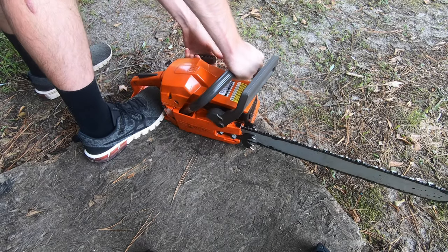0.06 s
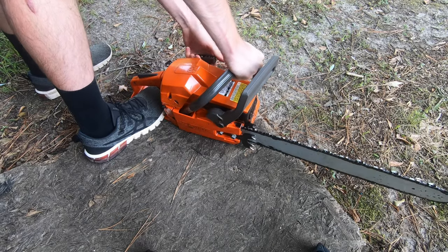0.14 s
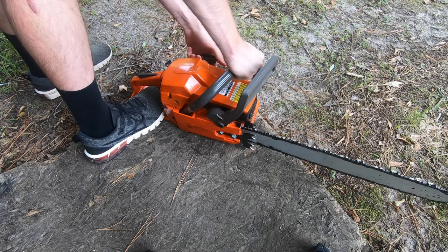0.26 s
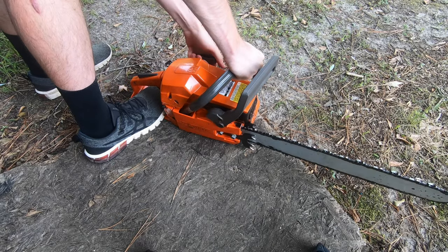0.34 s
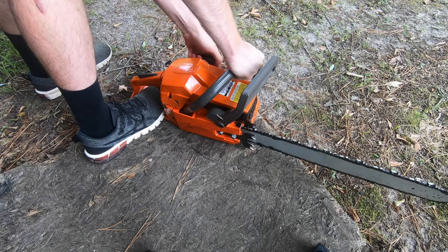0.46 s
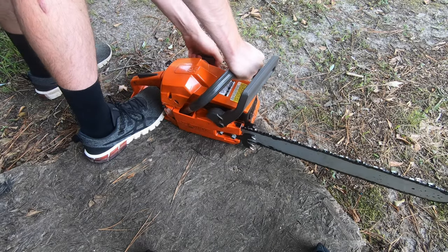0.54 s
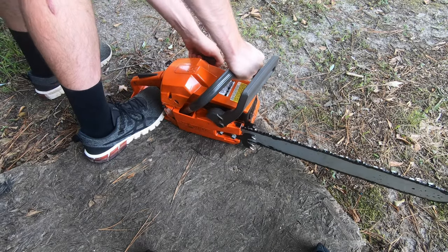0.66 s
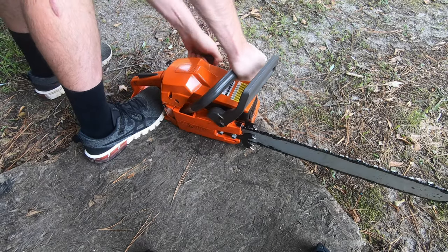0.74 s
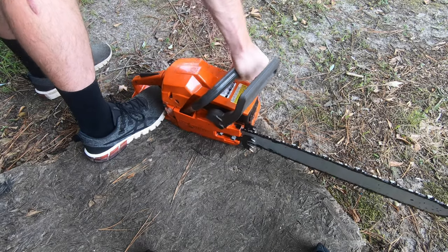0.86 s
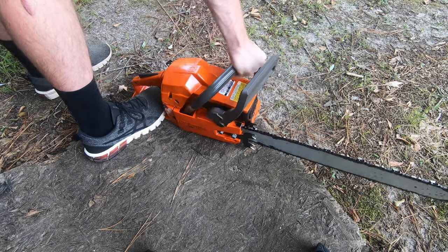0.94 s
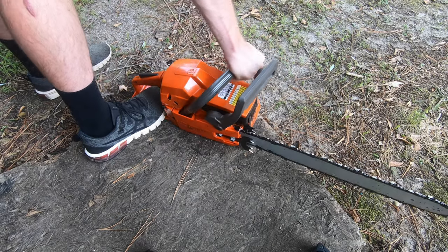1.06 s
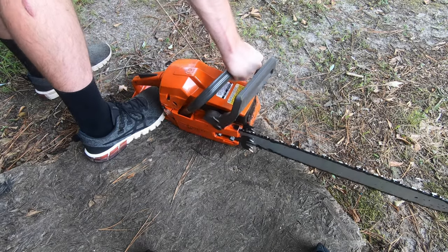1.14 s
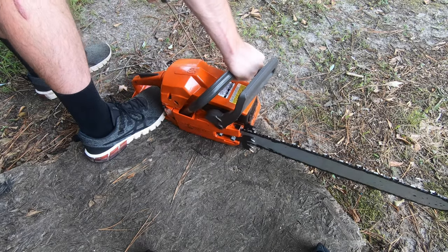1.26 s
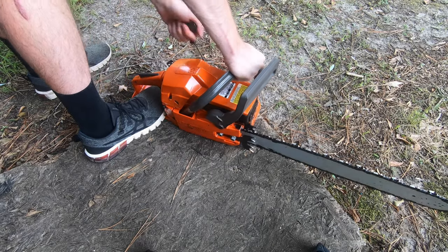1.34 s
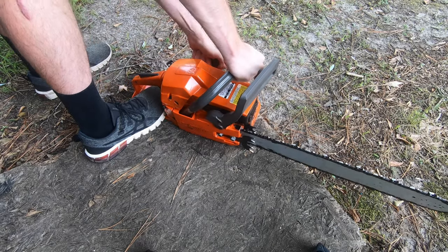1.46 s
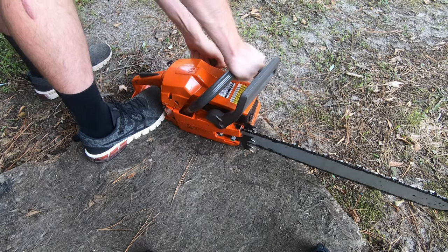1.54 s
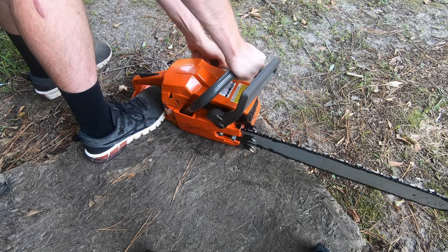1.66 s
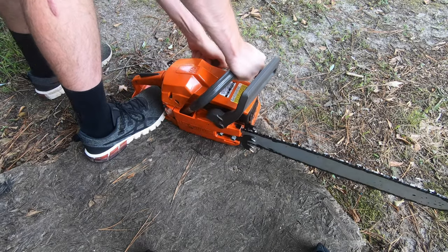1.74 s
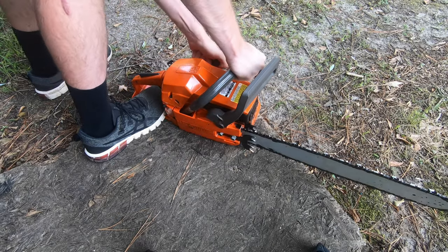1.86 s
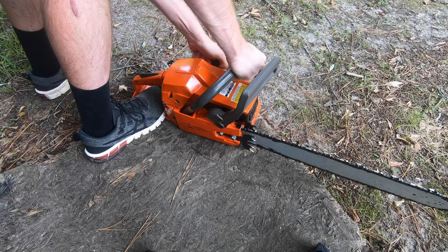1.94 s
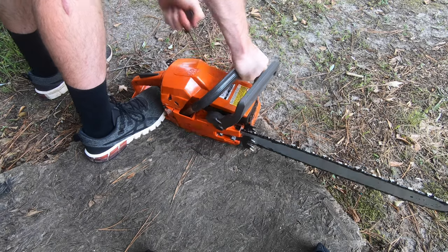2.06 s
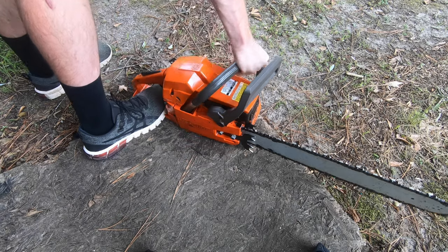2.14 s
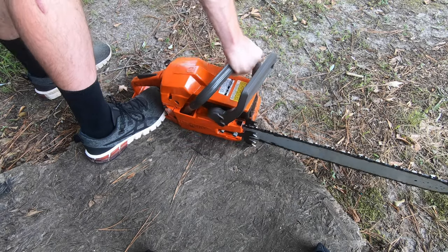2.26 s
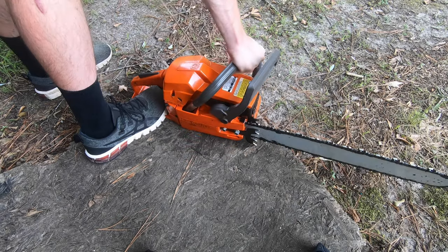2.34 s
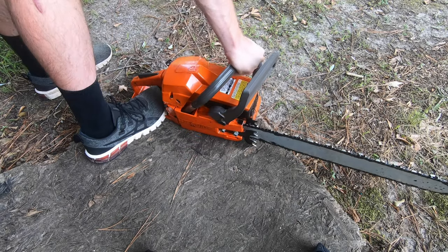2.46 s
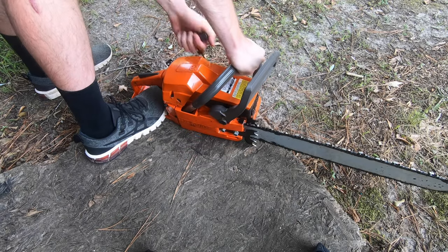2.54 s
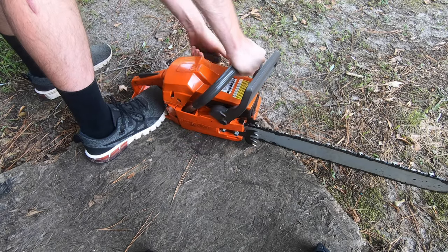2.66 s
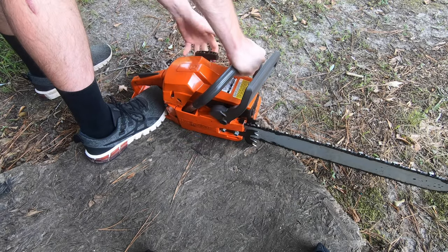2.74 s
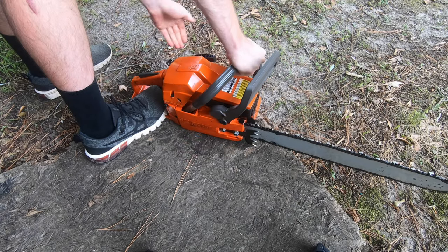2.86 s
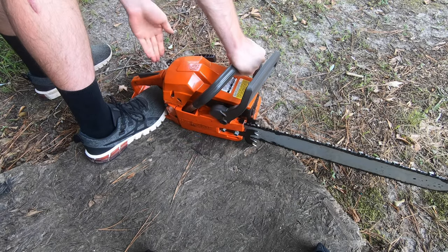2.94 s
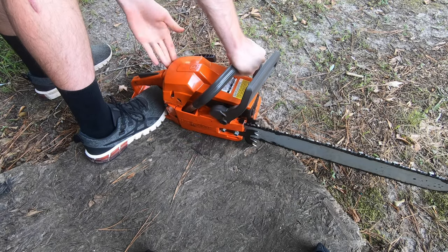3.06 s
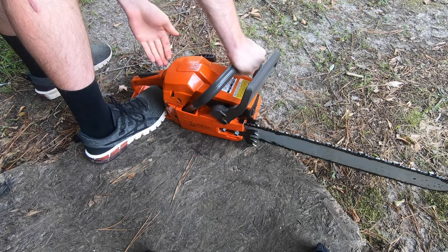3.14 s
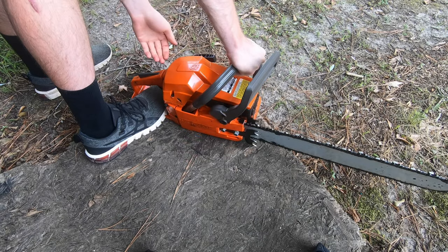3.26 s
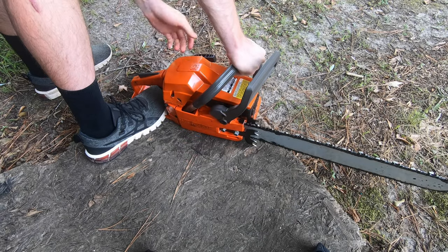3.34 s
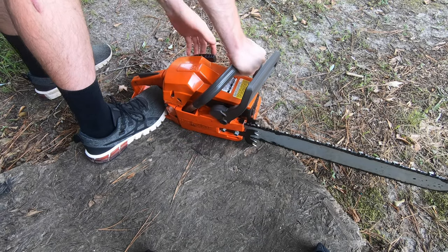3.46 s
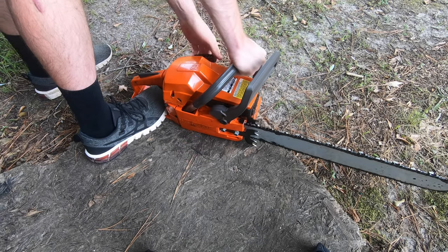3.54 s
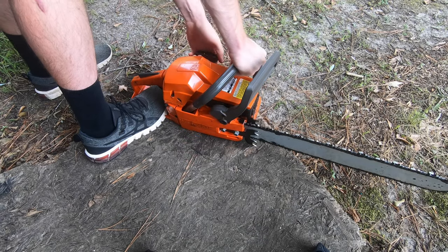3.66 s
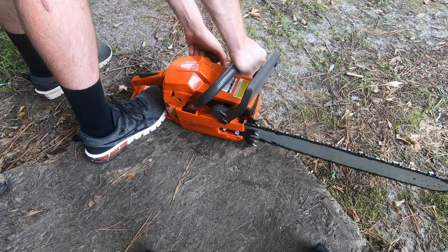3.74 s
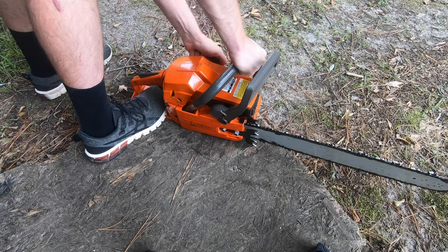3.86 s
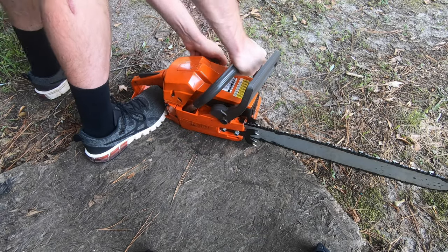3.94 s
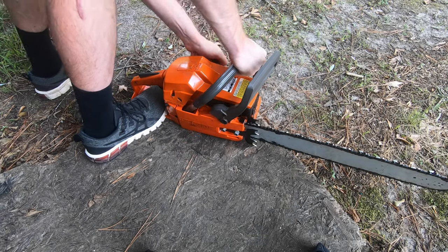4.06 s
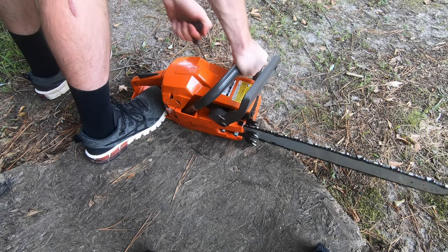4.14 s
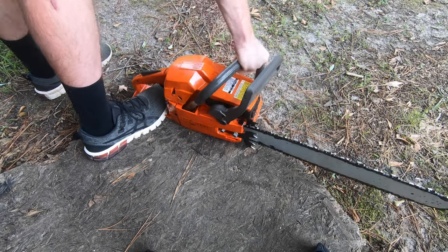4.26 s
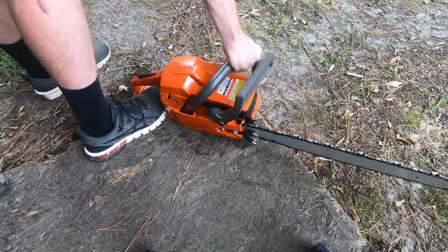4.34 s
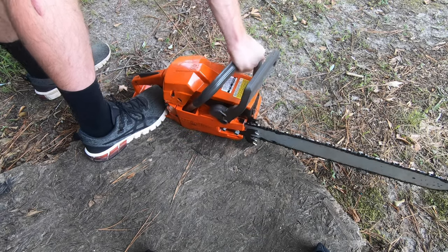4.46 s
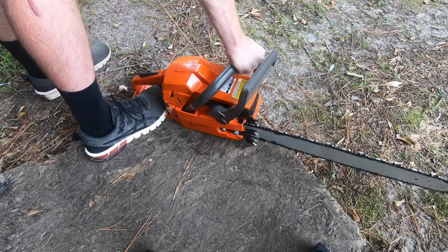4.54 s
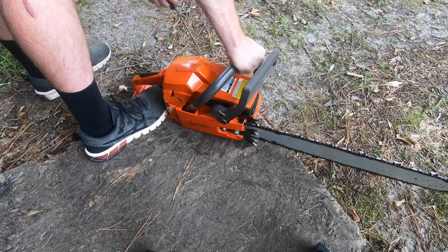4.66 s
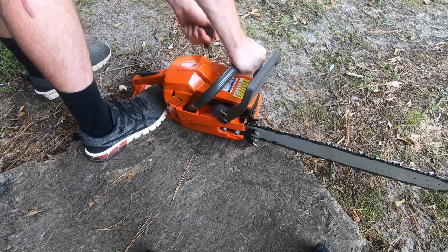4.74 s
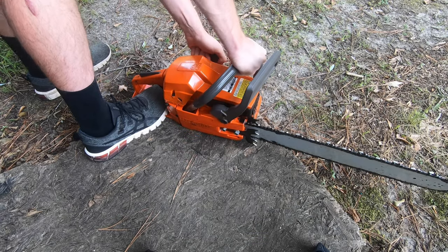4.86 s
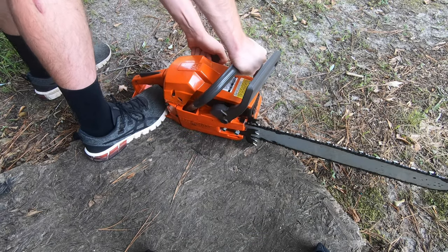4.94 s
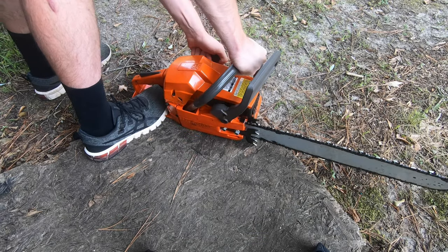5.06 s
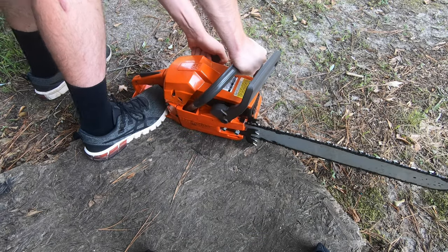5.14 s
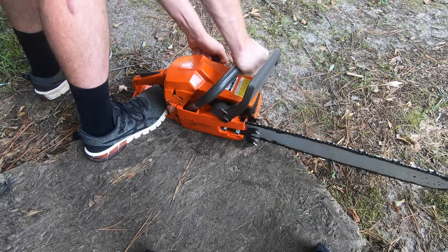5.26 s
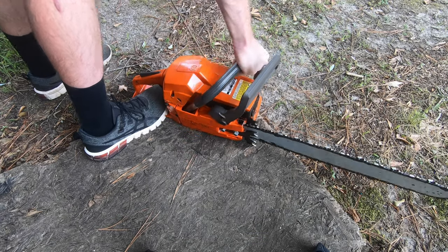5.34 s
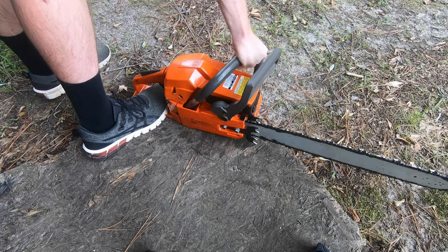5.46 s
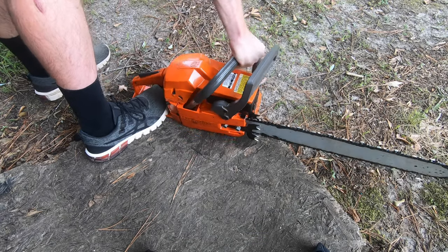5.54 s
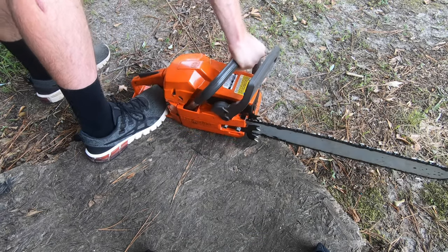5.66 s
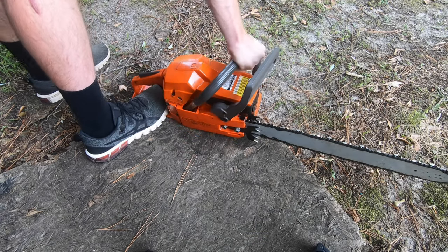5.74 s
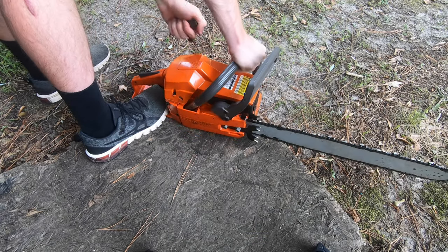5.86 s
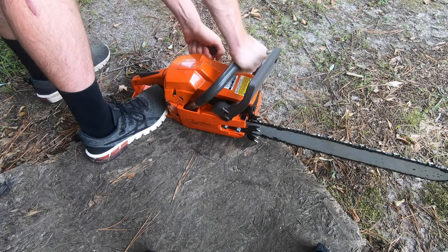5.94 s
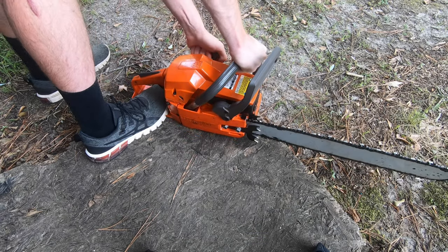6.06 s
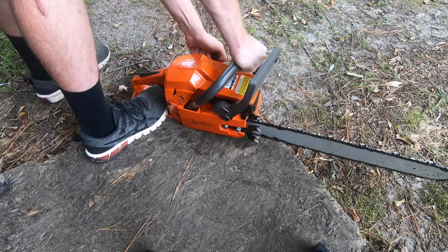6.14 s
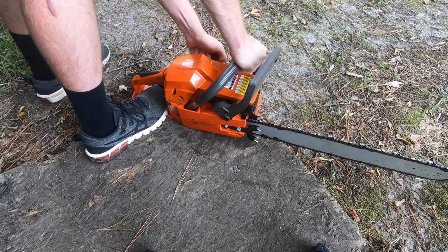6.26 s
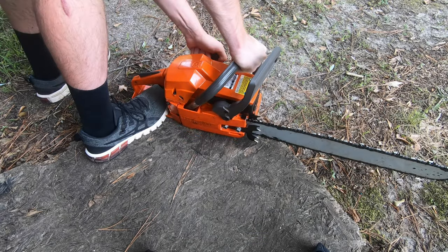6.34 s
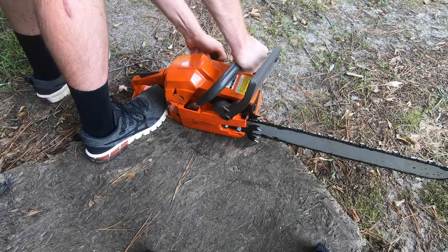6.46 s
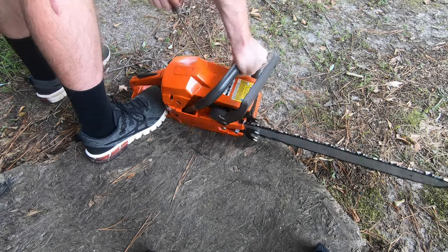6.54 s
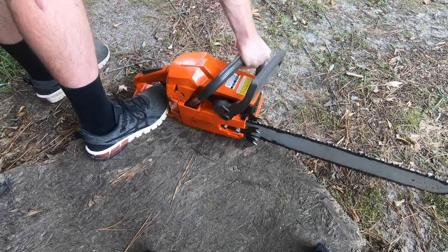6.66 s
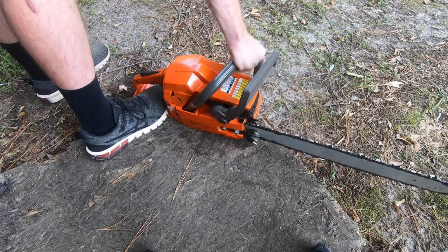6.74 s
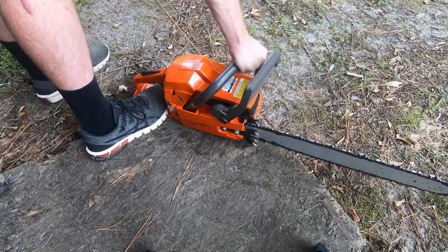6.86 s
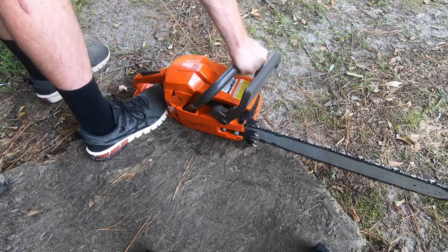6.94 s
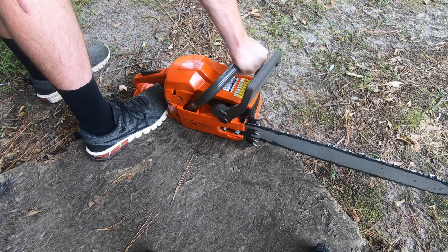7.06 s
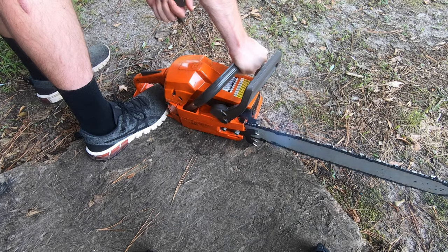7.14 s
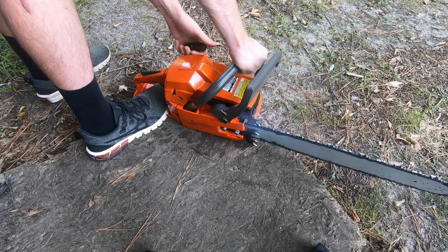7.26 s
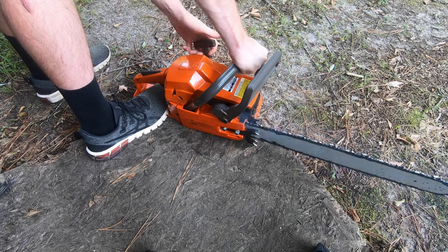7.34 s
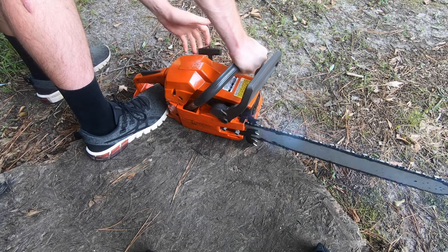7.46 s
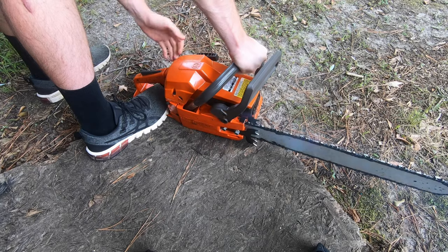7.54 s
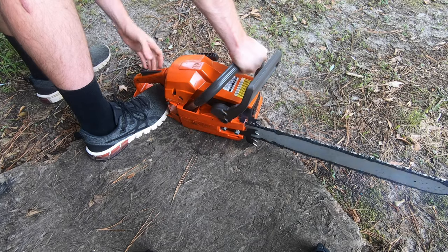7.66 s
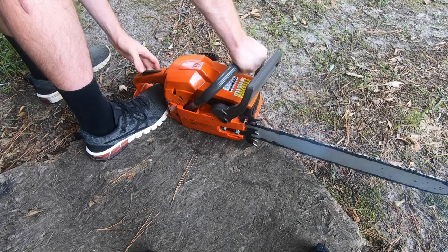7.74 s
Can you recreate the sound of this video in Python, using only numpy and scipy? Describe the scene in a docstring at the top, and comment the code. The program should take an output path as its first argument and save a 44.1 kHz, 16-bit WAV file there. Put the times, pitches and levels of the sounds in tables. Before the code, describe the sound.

Right beside the microphone, a two-stroke saw refuses to start four times: hard clack, short throbbing burst of air pulses, metallic rattling, sharp rasp, ticking rewind and dull handle knock, with quiet pauses between. On the fifth tug it fires, popping irregularly, surging and coasting, with a thin metallic ringing growing. Open yard, slight echo, low thumps, soft hiss.

```python
"""A two-stroke chainsaw on the ground outdoors is pulled five times on its cord and catches on the last pull.
Each crank turn gulps air (short filtered pulses) and rattles the piston (bursts of noise that ring).
The starter pawls clack and rasp, and the cord scrapes out and winds back, all made of coloured noise.
The idle lopes: the engine fires only every few turns, speeding up and coasting down in between.
Low booms and shaking, a faint echo and a distant rumble with soft hiss lie around it."""
import sys
import numpy as np
from scipy import signal
from scipy.fft import rfft, irfft
from scipy.io import wavfile
from scipy.ndimage import uniform_filter1d

SR = 44100
rng = np.random.default_rng(int(sys.argv[2]) if len(sys.argv) > 2 else 0)


def digitize_waveform(pressure):
    """Quantize a signal to 16-bit integers and store it at the path in sys.argv[1].

    Rows of a 2-D input are taken as channels; values are limited to [-1, 1].
    """
    field = np.atleast_2d(pressure).T
    bounded = np.clip(field, -1, 1)
    quanta = np.round(bounded * 32767).astype(np.int16)
    wavfile.write(sys.argv[1], SR, quanta)


N = 343539
TIME = np.arange(N) / SR


def amp(db):
    """Turns decibels into a gain."""
    return 10 ** (np.asarray(db) / 20)


def unit(x):
    """Scales to an rms of 1."""
    return x / np.sqrt(np.mean(x ** 2) + 1e-20)


def read(points, hz):
    """Reads a table between its points, on a log-frequency axis."""
    f, value = np.transpose(points)
    return np.interp(np.log(hz + 1), np.log(f + 1), value)


def add(mix, s, sound):
    """Mixes a sound in at time s."""
    part = mix[max(round(s * SR), 0):][:len(sound)]
    part += sound[:len(part)]


def response(spectrum, size=4096):
    """A filter of energy 1 with the given spectrum that answers only after it is struck."""
    log_gain = np.log(amp(read(spectrum, abs(np.fft.fftfreq(size, 1 / SR)))))
    minimum_phase = np.exp(np.conj(signal.hilbert(log_gain)))
    taps = np.fft.ifft(minimum_phase).real[:size // 2]
    return taps / np.linalg.norm(taps)


def through(x, taps):
    """Filters x and keeps its length."""
    return signal.oaconvolve(x, taps)[:len(x)]


def grit(count, spread_db):
    """Noise whose strength jumps every 16 samples, like tiny impacts of unequal size."""
    draws = rng.standard_normal(count // 16 + 1).clip(-2, 2)
    sizes = np.repeat(amp(max(spread_db, 0) * draws), 16)[:count]
    return unit(sizes * rng.standard_normal(count))


def spell(t, start, hold, rise_db_per_s, fall_db_per_s):
    """A gain that rises to 1 at start, holds, and dies away."""
    before, after = np.maximum(start - t, 0), np.maximum(t - start - hold, 0)
    return amp(-rise_db_per_s * before - fall_db_per_s * after)


# Colour of the outdoor background. Each row: frequency in Hz, level in dB.
AIR_COLOUR = [(15, -57.5), (25, -31.5), (35, -22.5), (54, -4), (137, -11.5), (170, -5), (285, -24),
              (405, -18), (575, -29.5), (774, -25.5), (987, -29.5), (1740, -29.5), (2340, -37), (8350, -52),
              (16000, -83.5)]
AIR_DB = -48.5


def outdoors():
    """Steady distant rumble and a soft hiss: filtered noise, partly shared by left and right."""
    noises = rng.standard_normal((3, N))
    common, left, right = (through(z, response(AIR_COLOUR, size=16384)) for z in noises)
    return unit(common + 1.12 * np.array([left, right])) * amp(AIR_DB) * amp([[-1.5], [1.5]])


def yard(x, t60=0.38, alike_from_hz=190, alike_to_hz=600):
    """Faint scatter from the ground and trees, different left and right except in the low middle."""
    t = np.arange(SR // 2) / SR
    common, *own = rng.standard_normal((3, len(t)))
    band = [alike_from_hz, alike_to_hz]
    alike = signal.butter(3, band, "bandpass", fs=SR, output="sos")
    apart = signal.butter(3, band, "bandstop", fs=SR, output="sos")
    tails = signal.sosfilt(alike, common) + signal.sosfilt(apart, own)
    tails = tails * amp(-60 * t / t60) * np.minimum(t / 0.014, 1)
    colour = response([(50, 14.0), (140, 11), (260, 1.5), (500, 5),
                       (1500, 2), (4000, -3.5), (7000, 2.5), (14000, 3.5)])
    coloured = through(x, colour)
    return np.array([through(coloured, tail / np.linalg.norm(tail)) for tail in tails])


# Spells of low shaking. Each row: time of full strength in seconds, hold in seconds, level in dB.
SHAKES = [(0.0, 0.015, -24), (1.119, 0.35, -24.5), (2.358, 0.26, -26.5), (4.39, .44, -26.5),
          (5.573, 0.44, -28.5), (6.855, 0.47, -26.5), (7.4, 0.47, -32)]
SHAKE_RISE_DB_PER_S, SHAKE_FALL_DB_PER_S = 77.5, 85


def shake_level():
    """How strong the low shaking is: each spell swells, holds and fades."""
    slopes = SHAKE_RISE_DB_PER_S, SHAKE_FALL_DB_PER_S
    return sum(amp(db) * spell(TIME, s, hold, *slopes) for s, hold, db in SHAKES)


def unsteady_rumble():
    """A low rumble of filtered noise comes and goes with the shaking, unrelated left and right."""
    colour = response([(20, -24.0), (38, -9.5), (60, -2.5), (110, 2.5),
                       (170, -9.5), (260, -18.5), (600, -73)], size=8192)
    rumble = np.array([through(z, colour) for z in rng.standard_normal((2, N))])
    return rumble * shake_level() * amp([[-7], [0]])


def shaking():
    """A low tone wavers around 38 Hz, swelling, holding and fading in spells."""
    sway = through(rng.standard_normal(N), signal.windows.hann(SR // 12))
    shake_hz = 38 + 3.5 * unit(sway)
    shake = np.sin(2 * np.pi * np.cumsum(shake_hz) / SR)
    return amp(-3.0) * unit(shake) * shake_level()


def boom(db, hz):
    """A low boom of two tones that swells and fades."""
    t = np.arange(SR // 4) / SR
    swell = t / .016
    tones = np.sin(2 * np.pi * hz * t) + 0.74 * np.sin(2 * np.pi * 0.57 * hz * t)
    return amp(db) * swell * np.exp(1 - swell) * tones


# Each pull begins as the pawls catch. Each row: start in seconds, clack level in dB,
# boom level in dB, piston rattle level of this pull in dB.
PULLS = [(0.846, -11.5, -19.5, -25.5), (2.108, -7.5, -24, -25.5), (4.202, -22, -31.5, -24),
         (5.365, -18, -22, -24.5), (6.564, -21.5, -22.5, -22)]
# The plastic cord handle lands on the case. Each row: start in seconds, knock level in dB,
# treble setting in dB, boom level in dB, boom pitch in Hz.
HANDLE_KNOCKS = [(0.008, -12.5, -20.5, -23.5, 144), (1.521, -13.5, -42, -34, 146),
                 (3.081, -23.5, -33.5, -36.5, 90), (3.729, -32.5, -22.5, -37.5, 158),
                 (4.917, -20, -46, -29, 146.4)]
PULL_BOOM_HZ, PULL_BOOM_LAG_S, KNOCK_BOOM_LAG_S = 138, .009, .023


def booms():
    """A low boom follows shortly after each pull begins and after each handle knock."""
    out = np.zeros(N)
    for s, _, db, _ in PULLS:
        add(out, s + PULL_BOOM_LAG_S, boom(db, PULL_BOOM_HZ))
    for s, _, _, db, hz in HANDLE_KNOCKS:
        add(out, s + KNOCK_BOOM_LAG_S, boom(db, hz))
    return out


def varied_ring(t60=.03, count=9):
    """A few short ringing tones at randomly varied pitches."""
    t = np.arange(SR // 25) / SR
    hz = np.geomspace(700, 8000, count)[:, None] * np.exp(.13 * rng.standard_normal((count, 1)))
    return np.sin(2 * np.pi * hz * t).sum(0) * amp(-60 * t / t60)


# Basic colour of a clack. Each row: frequency in Hz, level in dB.
CLACK_COLOUR = [(150, -21), (450, -10.5), (700, 0.5), (1000, -8), (1400, -2), (2000, -4), (2900, 0.5),
                (4000, -1), (5100, -1), (6500, -1.5), (8200, -3), (10500, -16.5), (14000, -27),
                (16000, -36)]


def clack(db, low_db, treble_db, t60, ring_db=-10):
    """One knock is a short burst of noise; soft parts sound low, steel parts bright."""
    t = np.arange(SR // 5) / SR
    hardness = [(1000, 0.79 * (low_db + 13.5)), (2600, 0), (6500, 0.76 * (treble_db + 9.5))]
    colour = [(hz, level + read(hardness, hz)) for hz, level in CLACK_COLOUR]
    blow = grit(len(t), spread_db=2) * np.minimum(t / 0.0023, 1) * amp(-60 * t / max(t60, .005))
    ring = varied_ring()
    blow = blow + amp(ring_db) * through(blow, ring / np.linalg.norm(ring))
    return amp(db) * through(blow, response(colour))


# Bright clacks of loose steel, and two dull piston slaps on slow turns (at 1.288 and 2.61 s).
# Each row: start in seconds, level in dB, treble setting in dB, time to decay by 60 dB in seconds.
CLACKS_AND_SLAPS = [(0.06, -34, -16.5, .05), (0.155, -24, -16, 0.025), (0.223, -46, -29, .04),
                    (1.132, -18, -10, 0.05), (1.181, -20, -6, .065), (1.22, -15.5, -13, 0.088),
                    (1.288, -23.5, -23.5, 0.051), (1.551, -26, -11.5, 0.055), (1.615, -25.5, -12.5, .046),
                    (2.452, -13.5, 1, 0.052), (2.536, -15.5, -4.5, .06), (2.61, -23.5, -27, .06),
                    (4.564, -19.5, -13.5, .037), (4.598, -12, -3, 0.031), (4.849, -20.5, -29.5, .03),
                    (5.014, -27.5, -40, 0.02), (5.044, -45, -31, .036), (5.687, -8.5, -1.5, .025),
                    (5.755, -14, -2, 0.024), (5.837, -12, -10, .038), (6.093, -16.5, -35, .02),
                    (6.137, -22.5, -22, .065), (7.109, -14, -11.5, .034)]
BOUNCE_S, BOUNCE_DB = .016, -4


def clacks():
    """The pawls catch, loose steel clacks, two slow turns slap dully, and the handle lands and bounces."""
    out = np.zeros(N)
    for s, db, _, _ in PULLS:
        add(out, s, clack(db, low_db=-11, treble_db=-17.5, t60=0.04))
    for s, db, treble_db, t60 in CLACKS_AND_SLAPS:
        add(out, s, clack(db, low_db=-15.5, treble_db=treble_db, t60=t60))
    for s, db, treble_db, _, _ in HANDLE_KNOCKS:
        add(out, s, clack(db, low_db=-3, treble_db=treble_db, t60=0.039, ring_db=-25.5))
        bounce = clack(db + BOUNCE_DB, low_db=-4, treble_db=treble_db, t60=0.038, ring_db=-25.5)
        add(out, s + BOUNCE_S, bounce)
    return out


# The cord winds back while the pawls tick over the flywheel.
# Each row: start in seconds, length in seconds, tick level in dB.
REWINDS = [(1.336, .12, -20.5), (2.694, .11, -24), (4.75, .09, -21), (6.002, 0.084, -21.5)]
TICK_GAP_S, TICK_SPREAD_DB = .021, 1.5


def rewinds():
    """The pawls tick unevenly as the spring winds the cord back in."""
    out = np.zeros(N)
    for start, length, db in REWINDS:
        for s in np.arange(start, start + length, TICK_GAP_S):
            late, size, bright = rng.standard_normal(3)
            tick_db = db + TICK_SPREAD_DB * size
            add(out, s + .003 * late, clack(tick_db, low_db=-12.5, treble_db=-16 + 3 * bright, t60=.038))
    return out


# The cord zips out before the first turn. Each row: start in seconds, level in dB, base pitch in Hz.
ZIPS = [(.88, -29.5, 664), (2.138, -31.5, 725), (4.243, -26.5, 663), (5.42, -30, 736), (6.62, -23.5, 633.5)]


def zips():
    """The cord scrapes out through its eyelet, swelling into a short falling buzz."""
    out, t = np.zeros(N), np.arange(round(0.039 * SR)) / SR
    swell_t = np.arange(round(.09 * SR)) / SR
    swell = np.interp(swell_t, [0, .01, .045, .07, .09], [0, .3, .4, 1, 0])
    eyelet = response([(150, -14.0), (450, 2.0), (700, -10.5), (1200, -6.5),
                       (2500, -16.5), (5000, -24.5), (12000, -45.0)])
    for s, db, hz in ZIPS:
        jitter = unit(uniform_filter1d(rng.standard_normal(len(t)), size=30))
        pitch = hz * np.linspace(1.2, .85, len(t)) * (1 + 0.35 * jitter)
        phase = 2 * np.pi * np.cumsum(pitch) / SR
        buzz = np.hanning(len(t)) * (np.sin(phase) + 0.23 * np.sin(2 * phase))
        add(out, s - .002, amp(db + 1) * unit(buzz))
        scrape = through(swell * grit(len(swell), spread_db=3), eyelet)
        add(out, s - .05, amp(db - 1.5) * scrape)
    return out


# The pawls skid off the flywheel at the end of each stroke.
# Each row: start in seconds, level in dB, length in seconds.
SKIDS = [(1.0512, -13.5, 0.029), (2.278, -13, 0.017), (4.3987, -13.5, 0.019), (5.549, -14.5, 0.026),
         (6.782, -14.5, 0.023)]
# Colour of the skids. Each row: frequency in Hz, level in dB.
SKID_COLOUR = [(2060, -37), (3500, -26.5), (4600, -5), (5030, -15), (5640, -3.5), (6610, 1), (7180, -10),
               (7940, -8), (9250, -15), (11300, -24.5), (13600, -21.5), (16000, -43)]


def skids():
    """The pawls catch twice on the flywheel as it overruns the starter: a bright rasp."""
    out = np.zeros(N)
    for s, db, length in SKIDS:
        u = np.arange(SR // 12) / SR / length  # time, in skid lengths
        contact = np.interp(u, [0, .06, .3, .5, .75, 1.1], [0.17, 1, 1.0, .45, 1.0, 0.043])
        add(out, s - .001, amp(db - 2.5) * contact * grit(len(u), spread_db=-4.5))
    return through(out, response(SKID_COLOUR))


# Ringing tones of the case, bar and chain. Each row: pitch in Hz, level in dB,
# time to decay by 60 dB in seconds.
CASE_TONES = [(743, -21.5, 0.024), (1419, -2, 0.15), (2046, -7, .07), (2170, -21.5, 0.21),
              (2760, -13, 0.21), (2855, -2.5, 0.03), (3690, -12.5, 0.24), (3960, -0.5, .1),
              (4615, 3.5, 0.087), (5740, 6, 0.11), (6700, 1, 0.11), (6900, -13.5, 0.092),
              (8160, -11.5, 0.28), (8100, -2.5, .2), (9953, -15.5, .2)]


def case_ring(x):
    """The case, bar and chain ring with their own tones when struck by x."""
    t = np.arange(SR // 2) / SR
    tones = sum(amp(db - 60 * t / t60) / np.sqrt(t60) * np.sin(2 * np.pi * hz * t)
                for hz, db, t60 in CASE_TONES)
    return through(x, tones / np.linalg.norm(tones))


# The engine fires. Each row: time in seconds, level in dB, crank turns until the next firing.
FIRINGS = [(6.9113, -2.5, 6), (7.0404, -9.5, 5), (7.1581, -4, 4), (7.241, -4.5, 6), (7.3481, -4, 6),
           (7.45, -5, 5), (7.5404, -5, 8), (7.6803, -5, 5), (7.7655, -4, 5)]


def clutch_ring(hz=5790, t60=0.89, knock_db=-55, firing_db=-36.0, running_t60=0.19, singing_db=-42):
    """The clutch drum rings after the first knock and each firing, and sings on through the idle."""
    out, t = np.zeros(N), np.arange(SR) / SR
    add(out, HANDLE_KNOCKS[0][0], amp(knock_db - 60 * t / t60) * np.sin(2 * np.pi * hz * t))
    for s, _, _ in FIRINGS:
        level_db = firing_db + 8 * (s - FIRINGS[-1][0])  # later firings ring louder
        tone = np.sin(2 * np.pi * (hz + rng.normal(0, 30)) * t)
        add(out, s, amp(level_db - 60 * t / running_t60) * tone)
    # the shoes brush the drum more and more
    brushing = np.interp(TIME, [7.2, 7.3, 7.79], [0, .7, 1.3])
    drum = amp(-60 * t / .15) * np.sin(2 * np.pi * 5850 * t)
    return out + amp(singing_db) * brushing * unit(through(rng.standard_normal(N), drum))


# Colour of the firing crack. Each row: frequency in Hz, level in dB.
BANG_COLOUR = [(100, 15), (300, 4.5), (900, -7), (2200, -1.5), (4200, 0.5), (5100, -4.5), (6200, 1),
               (8000, -2.5), (11000, -15), (14000, -20.5), (16000, -42)]


def firings():
    """A firing vents a short, sharp crack of noise from the muffler."""
    out, t = np.zeros(N), np.arange(SR // 20) / SR
    for s, db, _ in FIRINGS:
        vent = np.minimum(t / .0003, 1) * np.exp(-np.maximum(t - .0035, 0) / 0.0033)
        add(out, s, amp(db - 6) * vent * rng.standard_normal(len(t)))
    return through(out, response(BANG_COLOUR))


CORD_DB, REWIND_JINGLE_DB = -38.5, -43.5
CORD_RISE_DB_PER_S, CORD_FALL_DB_PER_S = 278.5, 326


def cord_jingle(t):
    """Loudness of the cord's jingle, at the end of each stroke and while it winds back."""
    slopes = CORD_RISE_DB_PER_S, CORD_FALL_DB_PER_S
    stroke_ends = sum(spell(t, s, 0, *slopes) for s, _, _ in SKIDS)
    winding = sum(spell(t, s, length, *slopes) for s, length, _ in REWINDS)
    return amp(CORD_DB) * stroke_ends + amp(REWIND_JINGLE_DB) * winding


KICK_S, COAST_S = .014, .44  # a firing speeds the crank up this fast; time constant of its coasting


def idle_speed():
    """Each firing kicks the crank, which then coasts for a whole number of turns."""
    gaps = np.diff([round(s * SR) for s, _, _ in FIRINGS])
    speed = []
    for gap, (_, _, count) in zip([*gaps, gaps[-1]], FIRINGS):
        coast = np.exp(-np.arange(gap) / SR / COAST_S)
        speed.append(coast * round(count) * SR / coast.sum())
    return np.concatenate(speed)


def crank(points, catches):
    """Times and crank speeds of one pull, carried on by the idle if the engine catches."""
    start = points[0][0]
    speed = np.interp(np.arange(start, points[-1][0], 1 / SR), *np.transpose(points))
    if catches:
        speed = uniform_filter1d(np.append(speed, idle_speed()), size=round(KICK_S * SR))
    return start + np.arange(len(speed)) / SR, speed


def by_speed(speed, law):
    """A gain that grows with crank speed and levels off at a knee."""
    knee, db_per_doubling = law
    return amp(db_per_doubling * np.minimum(np.log2(speed / knee), 0))


def stroke(turns, at, width):
    """A smooth window that opens once a turn."""
    return np.exp((np.cos(2 * np.pi * (turns - at)) - 1) / (2 * np.pi * width) ** 2)


# Colour of a gulp of air. Each row: frequency in Hz, level in dB.
GULP_COLOUR = [(15, -41), (50, -5.5), (100, -2.5), (170, -1.5), (245, 2.5), (340, -8.5), (430, -4),
               (500, -10.5), (570, -35.5), (780, -21.5), (1200, -32), (4000, -76.5)]


def gulps(t, speed, turns, level, lag_hz=330, lead=0.00287):
    """One gulp of air a turn through the air box; the slowest turns gulp longer, deeper and less evenly."""
    out, pole = np.zeros(N), np.exp(-2 * np.pi * lag_hz / SR)
    # the low notes lag, so each gulp falls in pitch
    gulp = signal.lfilter([-pole, 1], [1, -pole], response(GULP_COLOUR))
    samples = np.arange(len(gulp))
    for i in np.flatnonzero(np.diff(np.floor(turns))):
        uneven = np.interp(speed[i], [25, 50], [.07, .015])
        pitch = np.interp(speed[i], [10, 20, 40, 52, 62], [.65, .94, 1.04, .92, 1.06])
        pitch = pitch * np.exp(uneven * rng.normal())
        size = level[i] * np.sqrt(SR * pitch / speed[i]) * amp(1.7 * rng.normal())
        add(out, t[i] - lead, size * np.interp(samples * pitch, samples, gulp, right=0))
    return out


# Smooth throb of the crank and flywheel.
# Each row: multiple of the crank speed, level in dB against the gulp level.
THROB = [(2, -11.5), (3, -22.5), (4, -5.5), (7, -22), (8, -23.5)]


def throb(speed, turns, level):
    """Once the crank spins freely, multiples of its speed hum and glide with every change of it."""
    spinning = np.clip((speed - 24) / 12, 0, 1)
    hum = sum(amp(db) * np.cos(2 * np.pi * round(order) * turns) for order, db in THROB)
    return level * spinning * hum


def slaps(t, turns, at, level, chatter=0.001, scatter=0.11):
    """Once a turn, at the given crank angle, a burst of impacts rings a few patches of the casing."""
    out, u = np.zeros(N), np.arange(SR // 50) / SR
    for i in np.flatnonzero(np.diff(np.floor(turns - at)) > 0):
        patches = np.array([1750, 2450, 3500]) * np.exp(scatter * rng.standard_normal(3))
        ring = amp([-2, 0, -3]) @ np.sin(2 * np.pi * patches[:, None] * u) * np.exp(-u / 0.0018)
        burst = grit(len(u), spread_db=10.5) * u / chatter * np.exp(-2 * u / chatter)
        add(out, t[i] - .002, level[i] * amp(2 * rng.normal()) * unit(through(burst, ring)))
    return out


# Crank speed through each pull, one list a pull; the last one ends close to the first firing.
# Each row: time in seconds, speed in turns per second.
CRANKING = [
    [(.89, 23.9), (1.0, 36.9), (1.07, 36.6), (1.16, 19.8), (1.32, 16.8), (1.47, 9)],
    [(2.131, 24), (2.22, 39.9), (2.3, 43.4), (2.39, 28), (2.46, 21.1), (2.72, 10.8), (2.82, 7)],
    [(4.2365, 25.2), (4.33, 40), (4.42, 44.4), (4.49, 27.3), (4.54, 18.9), (4.7, 15.7), (4.87, 7)],
    [(5.41, 27.6), (5.49, 40.6), (5.56, 43.5), (5.65, 30.3), (5.73, 26.7), (5.8, 20), (6.02, 9.9),
     (6.12, 7)],
    [(6.62, 24.8), (6.75, 38.9), (6.83, 36.7), (6.89, 31.5), (6.912, 36)],
]
# Colour of the piston rattle. Each row: frequency in Hz, level in dB.
RATTLE_COLOUR = [(150, -18), (450, -5), (750, 3.5), (1200, -4.5), (1800, -0.5), (2400, 2), (3100, -3.5),
                 (4200, -6), (5100, -14.5), (7000, -17), (10000, -26), (15000, -57)]
# Colour of the chain and cord jingle. Each row: frequency in Hz, level in dB.
JINGLE_COLOUR = [(500, -19.5), (2500, -9), (5000, 1), (6300, 4.5), (8200, -4), (9500, 2.5), (11500, -24),
                 (14000, -14.5), (16000, -31)]
# loudness grows with crank speed up to a knee: (knee in turns per second, dB per doubling below it)
GULP_LAW, SLAP_LAW, RATTLE_LAW, CHAIN_LAW = (24.6, 17.5), (59.5, 5.1), (36.2, 10.1), (52, 30)
GULP_DB, CHAIN_DB = -20, -33.5  # base levels, before speed and the other changes
YANK_DB, YANK_S = 5.5, 0.12  # the first gulps of a pull are stronger; time constant of the extra
IDLE_GULP_DB, IDLE_RATTLE_DB = 0.66, -3.5  # changes once the engine runs by itself
IDLE_THROB_DB = 1.5  # the throb stands out more under the engine's own power
SLAP_TURN, SLOW_LATE_TURN, IDLE_LATE_TURN = .61, .29, 0.0698  # where in the turn the piston slaps
SLAP_DB, IDLE_SLAP_DB = 1, -4  # piston slap, and its change in the idle
PLAY_DB = -7  # knock of the starter's play, against the slaps


def engine():
    """Each turn gulps air once; the piston also slaps and the chain jingles. Returns (air, metal)."""
    air, knocks, rattle, jingle = np.zeros((4, N))
    for points, (_, _, _, rattle_db) in zip(CRANKING, PULLS):
        t, speed = crank(points, catches=points is CRANKING[-1])
        turns = np.cumsum(speed) / SR
        running = np.clip((t - FIRINGS[0][0]) / .07 + .5, 0, 1)
        on_cord = 1 - running
        yank_db = YANK_DB * np.exp((t[0] - t) / YANK_S)
        gulp = by_speed(speed, GULP_LAW) * amp(GULP_DB + yank_db + IDLE_GULP_DB * running)
        force = amp(rattle_db + IDLE_RATTLE_DB * running)
        slap = force * by_speed(speed, SLAP_LAW)
        chain = amp(CHAIN_DB) * by_speed(speed, CHAIN_LAW) + cord_jingle(t)
        air += gulps(t, speed, turns, gulp)
        add(air, t[0], throb(speed, turns, gulp * amp(IDLE_THROB_DB * running)))

        # the slaps come later in the turn when the crank labours against compression
        slow = np.clip((30 - speed) / 12, 0, 1)
        angle = SLAP_TURN + SLOW_LATE_TURN * slow + IDLE_LATE_TURN * running
        slap_level = slap * amp(SLAP_DB + IDLE_SLAP_DB * running)
        knocks += slaps(t, turns, angle, slap_level, chatter=0.0066)
        # the starter takes up its play
        knocks += slaps(t, turns, 0.32, slap * on_cord * (1 - slow) * amp(PLAY_DB))

        gate = .2 + .35 * running + stroke(turns, angle, .09)
        fade = signal.windows.tukey(len(t), .02)
        rattle_level = force * by_speed(speed, RATTLE_LAW) * unit(gate) * fade
        add(rattle, t[0], rattle_level * grit(len(t), spread_db=5.5))

        # chain links clink at random, about 260 times a second
        link_sizes = amp(4.3 * rng.standard_normal(len(t)).clip(-2, 2))
        links = link_sizes * (rng.random(len(t)) < 260 / SR)
        clinks = unit(through(links, np.exp(-np.arange(400) / 55)))
        add(jingle, t[0], chain * unit(0.16 + clinks) * fade * rng.standard_normal(len(t)))
    rattling = amp(2.5) * through(rattle, response(RATTLE_COLOUR))
    jingling = amp(-2) * through(jingle, response(JINGLE_COLOUR))
    return air, knocks + rattling + jingling


# How alike left and right are. Each row: frequency in Hz, likeness from 0 to 1.
LIKENESS = [(100, .95), (300, .99), (700, .94), (2500, .93), (5000, .82), (8000, .55), (15000, .55)]
# Balance of the two sides. Each row: frequency in Hz, left minus right in dB.
TILT = [(35, -10), (70, -6), (140, -3), (260, 0), (600, 2), (1100, 1), (2500, 1.8), (5000, 1.4),
        (9000, 2.5), (15000, 2)]
# Phase between the sides. Each row: frequency in Hz, angle in radians by which left leads.
LEAD = [(35, 1.7), (70, 1.3), (130, .4), (200, 0), (500, .25), (1290, -.3), (2000, .1), (5170, .3),
        (6900, .6), (8100, .9), (9000, 2.2), (15000, .9)]


def ports(x):
    """Left and right hear the saw with their own level, phase and nearby reflections."""
    hz, t = np.fft.rfftfreq(2 * N, 1 / SR), np.arange(SR // 100) / SR
    scatter = rfft(rng.standard_normal(len(t)) * np.exp(-t / .003), 2 * N)
    scatter = scatter / np.sqrt(np.mean(abs(scatter) ** 2))
    same = np.clip(read(LIKENESS, hz), 0, 1)
    apart = .7 * np.sqrt((1 - same) / (1 + same)) * scatter
    side = amp(read(TILT, hz) / 2) * np.exp(1j * read(LEAD, hz) / 2)
    both = np.array([(1 + apart) * side, (1 - apart) / side])
    return irfft(rfft(x, 2 * N) * both)[:, :N]


def scene():
    """The saw close by, its faint echo, low booms and shaking, and the open air."""
    air, rattle = engine()
    metal = rattle + clacks() + rewinds() + skids() + firings()
    saw = air + zips() + amp(-3.5) * metal + amp(-18.5) * case_ring(metal) + clutch_ring()
    close = ports(saw + shaking() + booms())
    return close + amp(-10) * yard(saw) + unsteady_rumble() + outdoors()


LOUD_DB, RECOVER_DB_PER_S, MAX_LIFT_DB = -25.5, 4.5, 4.5  # automatic gain control
EDGE_HZ = 15700  # top of the audible band here


def record(dry):
    """The gain creeps up in pauses and drops at loud sounds; peaks are rounded; the top treble is cut."""
    power_db = 10 * np.log10(abs(uniform_filter1d((dry ** 2).mean(0), size=400)) + 1e-12)
    recovery = RECOVER_DB_PER_S * TIME
    held_db = np.maximum.accumulate(np.minimum(power_db, LOUD_DB) + recovery) - recovery
    lift_db = uniform_filter1d(np.minimum(LOUD_DB - held_db, MAX_LIFT_DB), size=200)
    rounded = np.tanh(dry * amp(lift_db) / 1.042)
    low_pass = signal.firwin(511, EDGE_HZ, window=("kaiser", 9), fs=SR)
    return signal.oaconvolve(rounded, low_pass[None], "same")


dry = scene()
out = record(dry)
digitize_waveform(out)
```